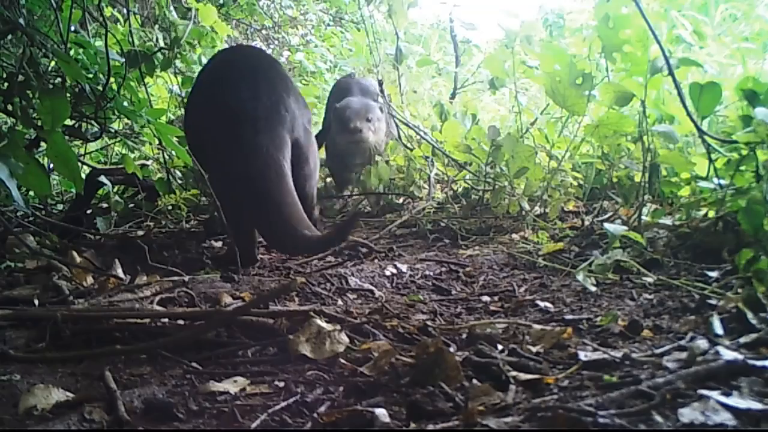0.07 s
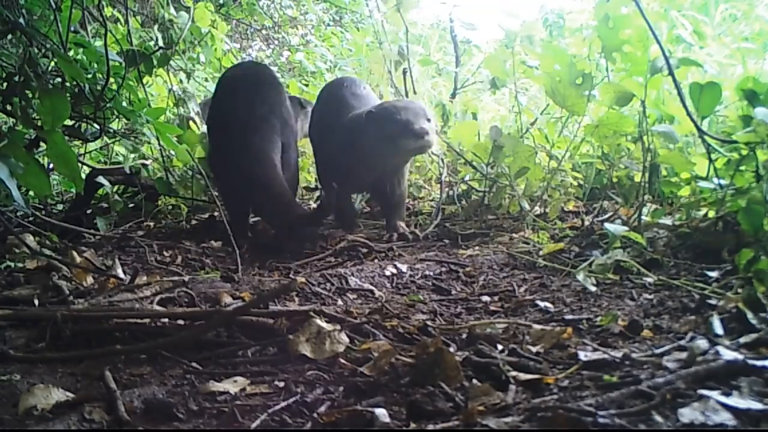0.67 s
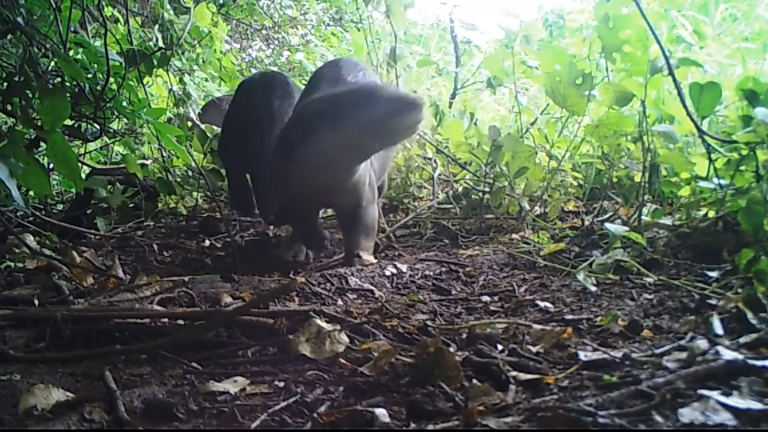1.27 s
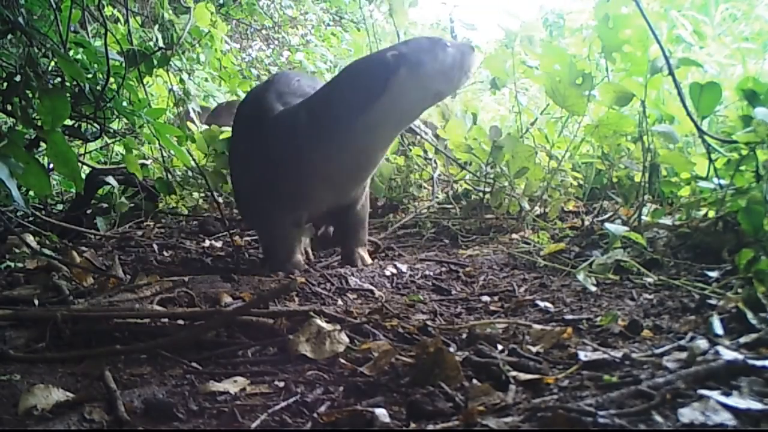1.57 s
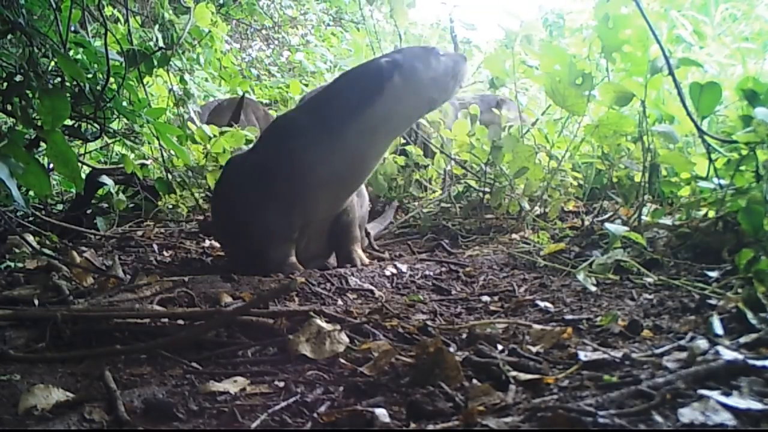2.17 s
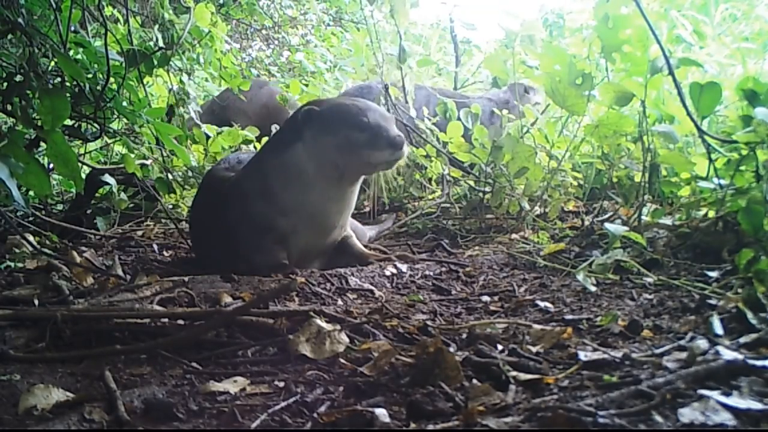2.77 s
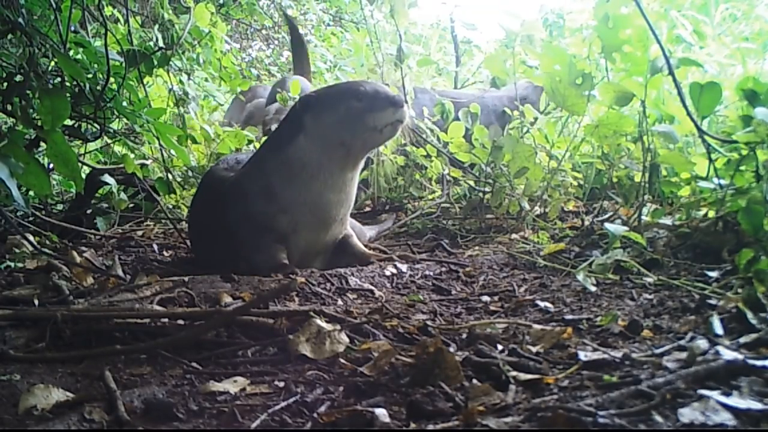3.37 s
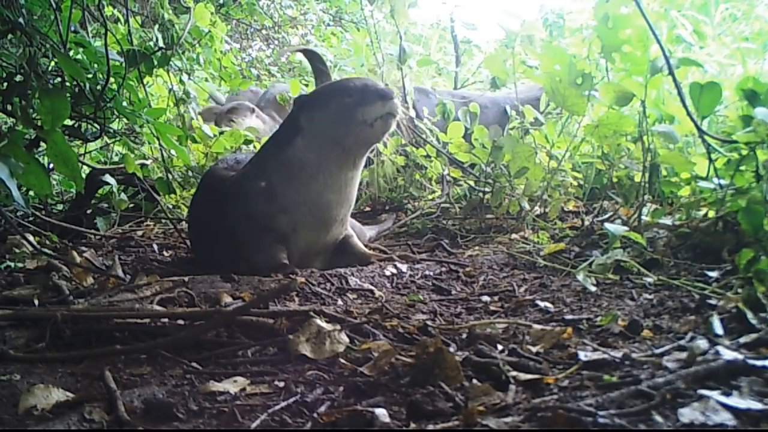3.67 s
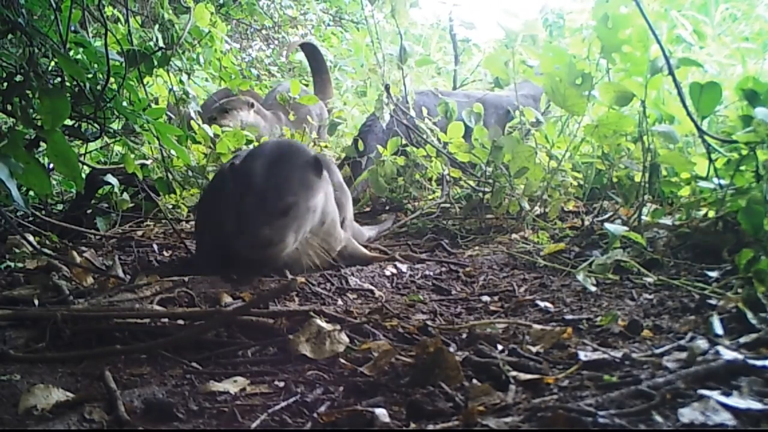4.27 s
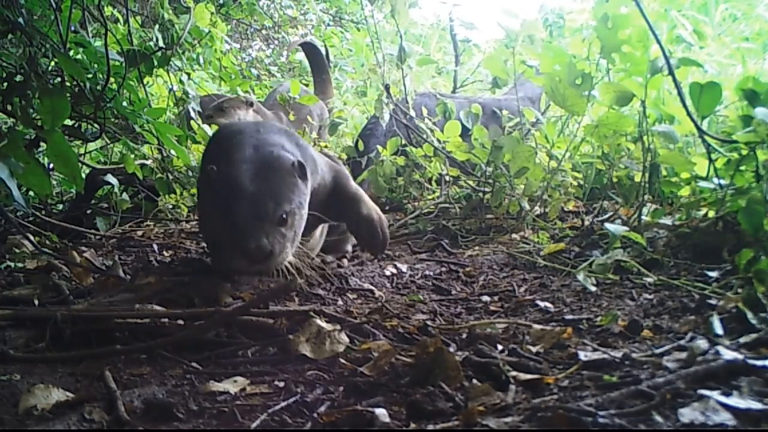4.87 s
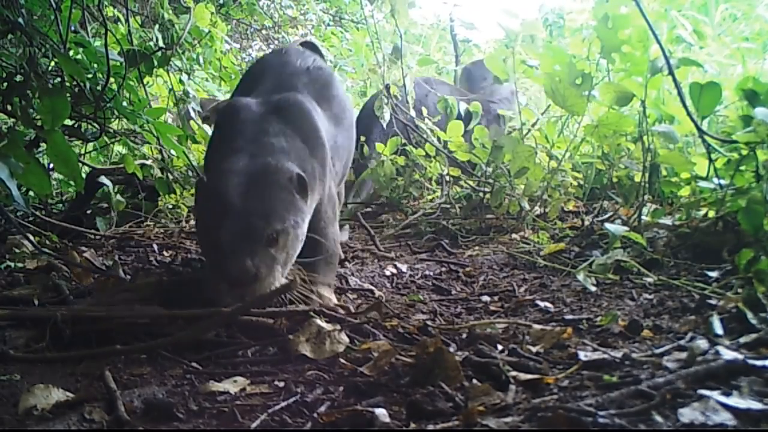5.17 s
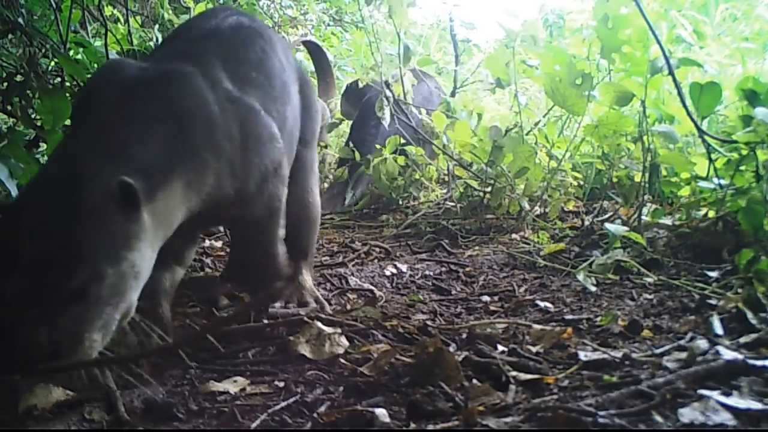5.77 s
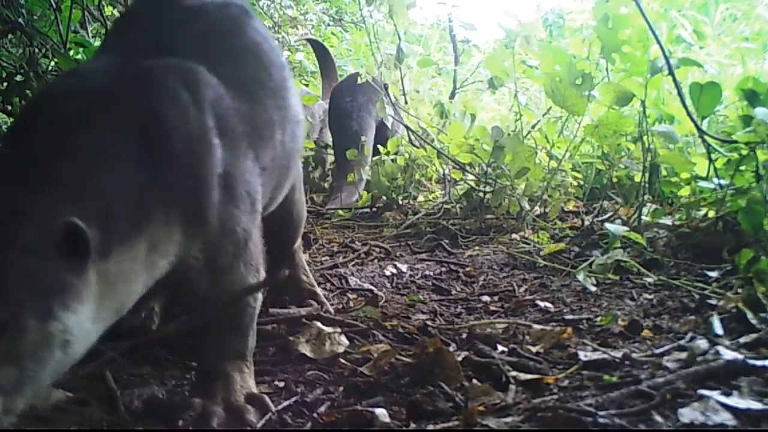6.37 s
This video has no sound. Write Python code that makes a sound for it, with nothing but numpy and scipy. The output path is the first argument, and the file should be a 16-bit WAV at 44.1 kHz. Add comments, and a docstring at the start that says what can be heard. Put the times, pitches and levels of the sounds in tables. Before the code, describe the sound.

An otter snorts a puff of air through its nose, then gives two short whistled squeaks edged with tiny low yelps, the second louder. Afterwards a distant bird repeats a quick three-note phrase while a faint low drone swells and fades. Paws crackle softly in leaf litter, busier near the end. A trail camera microphone picks this up in a thicket, over steady low rumble and faint high insects.

```python
"""A low far-off rumble and two trilling insects open on a thicket, where otters rustle over leaf litter.
One snorts and puffs air through its nose; two whistled squeaks follow, their voice breaking into low yelps.
A distant bird repeats a three-note phrase while a low drone swells and fades, and paws crackle on
through the leaves. The insects sing with their wings; leaves and stems scatter the calls and the trill."""
import sys
import numpy as np
from scipy import signal
from scipy.fft import rfft, irfft, next_fast_len
from scipy.io import wavfile
from scipy.ndimage import map_coordinates

SR = 44100
rng = np.random.default_rng(int(sys.argv[2]) if len(sys.argv) > 2 else 0)


def to_wav(sig):
    """Store sig (one row per channel, or 1-D mono) as 16-bit WAV at the path in sys.argv[1].

    Samples outside -1..1 are clipped; the rate is SR.
    """
    pcm = np.clip(np.atleast_2d(sig), -1, 1) * 32767
    pcm = np.round(pcm).astype(np.int16)
    wavfile.write(sys.argv[1], SR, pcm.T)  # frames by channels


N = 282681
WAKE_S = 0.093  # silence until here


def amp(db):
    """Decibels to gain."""
    return 10 ** (np.asarray(db) / 20)


def unit(x):
    """Scale to rms 1."""
    return x / np.sqrt(np.mean(x ** 2) + 1e-20)


def along(points, hz):
    """Read (freq_hz, value) points on a log frequency axis."""
    freqs, values = np.transpose(points)
    return np.interp(np.log(hz + 1), np.log(freqs + 1), values)


def clock():
    """The time of every sample, in seconds."""
    return np.arange(N) / SR


def wobble(rate_hz):
    """A smooth random curve with rate_hz knots a second."""
    return map_coordinates(rng.standard_normal(int(N * rate_hz / SR) + 4), [clock() * rate_hz])


def envelope(start, end, attack, release):
    """Rise from the start, hold, and fall to nothing at the end."""
    t = clock()
    return np.clip(np.minimum((t - start) / attack, (end - t) / release), 0, 1)


def filtered(x, response):
    """Filter x by a response given as a function of frequency."""
    size = next_fast_len(N + SR // 2)
    return irfft(rfft(x, size) * response(np.fft.rfftfreq(size, 1 / SR)), size)[:N]


def colour(x, spectrum):
    """EQ x with (freq_hz, gain_db) points, at rms 1."""
    return unit(filtered(x, lambda hz: amp(along(spectrum, hz))))


def noise(spectrum):
    """Noise with the given EQ, at rms 1."""
    return colour(rng.standard_normal(N), spectrum)


def running_phase(hz):
    """The phase of a pitch curve, in radians."""
    return 2 * np.pi * np.cumsum(hz) / SR


def rasp(hz, width_hz=680):
    """Noise in one narrow resonance that follows a pitch curve."""
    phase = running_phase(hz)
    return unit(wobble(width_hz) * np.sin(phase) + wobble(width_hz) * np.cos(phase))


def echo(x, delay_s, db):
    """Add one delayed reflection."""
    return x + amp(db) * filtered(x, lambda hz: np.exp(-2j * np.pi * hz * delay_s))


# Reverb time of the thicket, before stretch: freq_hz, t60_s
THICKET_DECAY = [(500, .1), (2000, 0.17), (4200, 0.1297), (6000, 0.21), (10000, 0.16)]
# Reverb EQ, bright because small leaves throw back short waves best: freq_hz, gain_db
THICKET_EQ = [(1000, -2), (3800, 2.5), (5400, -1), (7500, 4), (10500, 2.5), (14000, -4)]
def thicket(x, wet_db, stretch, build_s):
    """Add the scatter from leaves and stems, a short tail that takes a moment to build."""
    hz, t, spectra = signal.stft(rng.standard_normal(SR // 2), SR, nperseg=256)
    decay_db = -60 * t / (stretch * along(THICKET_DECAY, hz)[:, None])
    tail = signal.istft(spectra * amp(decay_db + along(THICKET_EQ, hz)[:, None]), SR, nperseg=256)[1]
    tail *= 1 - np.exp(-(np.arange(len(tail)) / SR / build_s) ** 2)
    return x + amp(wet_db) * signal.fftconvolve(x, tail / np.linalg.norm(tail))[:N]


# Low end of the bed: freq_hz, gain_db
RUMBLE_EQ = [(12, -34), (20, 0.5), (30, 2), (39, -3), (54, -5), (92, -7.5), (168, -16.5), (225, -19),
             (273, -21.5), (443, -27), (512, -29), (652, -32), (1520, -41.5), (3910, -47.5), (6500, -50),
             (8450, -93), (14300, -120)]
# Airy top of the bed: freq_hz, gain_db
HISS_EQ = [(3000, -29), (5500, -7), (7000, 2.5), (8500, 3), (10000, -1), (12000, -1.5), (14000, -3)]
def background(rumble_db=-50.5, sway_db=0.52, rise_db=2, full_s=0.268, hiss_db=-76):
    """A far-off rumble eases up to level and sways slightly under a thin, even hiss."""
    fade_db = rise_db * np.clip((clock() - full_s) / (full_s - WAKE_S), -1, 0)
    rumble = amp(rumble_db + fade_db + sway_db * wobble(7.5)) * noise(RUMBLE_EQ)
    return rumble + amp(hiss_db) * noise(HISS_EQ)


# The drone's bass hump: freq_hz, gain_db
DRONE_EQ = [(60, -27), (100, -3.5), (127, -5), (150, -12.5), (260, -31), (900, -83)]
def drone(level_db=-59.5):
    """A narrow band of low noise swells and fades far away."""
    return amp(level_db) * envelope(2.15, 4.77, attack=0.33, release=1) * noise(DRONE_EQ)


# The higher insect's held buzzes: start_s, end_s, pitch_hz, level_db
HELD_BUZZES = [(.05, 1.463, 8440, -77.5), (3.4, 5.3, 8650, -85.5), (5.5, 6.5, 8680, -83)]
# Its surges, growing longer as it warms up: peak_s, rise_s, level_db
BUZZ_SURGES = [(2.54, .06, -83), (2.96, .07, -77.5), (3.351, 0.1, -76.5), (3.76, .09, -76),
               (4.209, .16, -75.5), (4.662, 0.23, -76.5), (5.14, 0.26, -76)]
def insect_buzz(rest_hz=8560, lift_hz=292, fall_ratio=0.58, edge_s=0.039, ragged_db=1.5):
    """Uneven strokes rasp in one narrow resonance, held steady or in surges that lift the pitch."""
    held = sum(amp(db) * envelope(start, end, edge_s, edge_s) * rasp(np.full(N, hz))
               for start, end, hz, db in HELD_BUZZES)
    effort, gain = np.zeros(N), np.zeros(N)
    for peak, rise, db in BUZZ_SURGES:
        t = clock() - peak
        swell = np.exp(-(t / np.where(t < 0, rise, fall_ratio * rise)) ** 2)
        effort += swell
        gain += amp(db) * swell
    surges = gain * rasp(rest_hz + lift_hz * effort)
    return (held + surges) * amp(ragged_db * wobble(60))


# The lower insect's bouts: start_s, end_s, attack_s, level_db
TRILL_BOUTS = [(0.073, .37, 0.044, -71.5), (5.456, 6.327, 0.14, -72.5)]
def insect_trill(pitch_hz=7230, swing_hz=125, strokes_hz=23, depth_db=4.0, rasp_hz=140):
    """An insect's wing strokes each slide down in pitch; the foliage smears them."""
    bouts = sum(amp(db) * envelope(start, end, attack, release=0.054)
                for start, end, attack, db in TRILL_BOUTS)
    stroke = running_phase(strokes_hz * (1 + 0.0206 * wobble(4.5)))
    hz = pitch_hz + swing_hz * np.cos(stroke) + rasp_hz * wobble(700)
    pulses = np.sin(running_phase(hz)) * amp(depth_db * np.sin(stroke))
    return bouts * unit(thicket(pulses, wet_db=-5.0, stretch=0.69, build_s=0.0059))


# One phrase, the last two rows joined as one note:
# delay_s, length_s, first_hz, last_hz, level_db, jitter_ratio
BIRD_NOTES = [(0, 0.024, 3996, 4044, -71.5, 0.0068), (0.041, 0.0363, 6260, 5490, -67.5, 0.0225),
              (0.096, .03, 3220, 3080, -75.5, .035), (.111, .033, 3390, 5220, -65.5, 0.014)]
# Each repeat trims and stretches those notes: start_s, trim_db, stretch_ratio
BIRD_PHRASES = [(2.352, -1, 1.01), (2.662, -1, 1.028), (2.972, 0, 1.0), (3.277, 0, 1.04)]
def bird(trim_db=-4, bend=0.85, arch=0.61):
    """A clean level note, a hoarse falling one and an upsweep, half lost in the bushes."""
    song = np.zeros(N)
    for start, phrase_db, stretch in BIRD_PHRASES:
        waver = wobble(700)
        for delay, length, first_hz, last_hz, db, jitter in BIRD_NOTES:
            onset = start + stretch * delay
            progress = np.clip((clock() - onset) / (stretch * length), 0, 1)
            hz = first_hz + (last_hz - first_hz) * progress ** bend  # the slide slows towards its end
            swell = (4 * progress * (1 - progress)) ** arch
            song += swell * amp(db + phrase_db) * np.sin(running_phase(hz * (1 + jitter * waver)))
    with_bush_echo = echo(song, delay_s=0.032, db=-12)
    return amp(trim_db) * thicket(with_bush_echo, wet_db=2.5, stretch=1.1, build_s=0.0009)


def presses(rows):
    """The summed swells of paws taking weight."""
    return sum(amp(db) * np.exp(-0.5 * ((clock() - peak) / half) ** 2) for peak, half, db in rows)


# Steps and scuffs in the leaves: peak_s, half_length_s, level_db
LEAF_STEPS = [(.22, 0.077, -75), (.53, 0.031, -71.5), (0.706, 0.021, -69.5), (1.294, 0.066, -76.5),
              (2.08, 0.072, -72.5), (2.283, 0.013, -70), (2.335, 0.017, -68.5), (2.75, 0.02, -73.5),
              (3.0, 0.084, -77), (3.48, 0.0315, -76.5), (3.76, .015, -76), (3.908, 0.015, -69),
              (3.955, .016, -75), (4.23, 0.016, -76), (5.252, 0.013, -70.5), (5.30, 0.076, -68),
              (5.42, 0.028, -73.5), (5.568, 0.059, -68), (5.92, 0.089, -72.5), (6.04, 0.03, -74),
              (6.097, 0.02, -70), (6.39, 0.053, -71.5)]
# Crisp leaf litter: freq_hz, gain_db
LEAF_EQ = [(700, -15.5), (2000, -9), (4000, -6.5), (6000, -3.5), (8000, 0), (9500, -7), (11500, -14),
           (14000, -39)]
# Near paws crunching the soil: peak_s, half_length_s, level_db
SOIL_STEPS = [(5.385, .012, -69), (6.112, 0.0165, -71), (6.31, 0.04, -74)]
# Dull soil: freq_hz, gain_db
SOIL_EQ = [(200, -18), (600, 3.5), (1500, -3), (2500, -15), (5000, -30)]
def paw_steps(grain_db=2.0, clump_db=1.0, snaps_per_s=64, snap_db=-11):
    """Paws press damp litter: clumps of crackle, snapping twigs and leaf edges, a crunch of soil."""
    crackle = rng.standard_normal(N) * amp(grain_db * wobble(1100) + clump_db * wobble(130))
    snaps = (rng.random(N) < snaps_per_s / SR) * rng.uniform(0.5, 1, N)
    litter = colour(unit(crackle) + amp(snap_db) * unit(snaps), LEAF_EQ)
    return presses(LEAF_STEPS) * litter + presses(SOIL_STEPS) * noise(SOIL_EQ)


# Breath through the snout: freq_hz, gain_db
SNOUT_EQ = [(530, -49), (900, -15), (942, -16), (1030, -13), (1460, -18.5), (2110, -9.5), (5920, -7),
            (6640, -7), (9050, -4.5), (14000, -25.5)]
def snuffle(start_s=0.3, end_s=0.526, level_db=-59.5, nose_hz=5840, rise_hz_per_s=2200, nose_db=-7.5):
    """An otter blows one puff through its nose; a faint nostril whistle grows and rises with it."""
    puff = envelope(start_s, end_s, attack=0.074, release=0.07)
    age = np.clip(clock() - start_s, 0, end_s - start_s)
    whistle = amp(nose_db) * age / age.mean() * rasp(nose_hz + rise_hz_per_s * age, width_hz=280)
    return puff * amp(level_db + 0.67 * wobble(86)) * (noise(SNOUT_EQ) + whistle)


# Midrange body of the snort: freq_hz, gain_db
SNORT_EQ = [(500, -30), (950, 0), (1400, -7), (2300, -6), (3200, -25)]
def snort(start_s=0.322, length_s=0.023, level_db=-61.5):
    """The nostrils open with a dull burst."""
    burst = envelope(start_s, start_s + length_s, length_s / 2, length_s / 2)
    return amp(level_db) * burst * noise(SNORT_EQ)


# Breath leading into the first squeak: start_s, end_s, centre_hz, width_hz, level_db
THROAT_WHEEZES = [(0.813, 0.838, 5955, 593.6, -65), (0.834, 0.86, 8740, 2660, -62.5)]
def wheezes():
    """Air squeezes through the otter's tight throat."""
    air = np.zeros(N)
    for start, end, hz, width_hz, db in THROAT_WHEEZES:
        edge_s = (end - start) / 2
        air += amp(db) * envelope(start, end, edge_s, edge_s) * rasp(np.full(N, hz), width_hz)
    return air


def voice(rows, jitter, flutter_db, dive_hz_per_s=60000, mouth_hz=3750, mouth_width_hz=220, mouth_db=11.5):
    """A voiced glide that roughens as it dives and flares as it sweeps through the mouth's resonance."""
    times, *columns = np.transpose(rows)
    hz, db, octave_db = [np.interp(clock(), times, column) for column in columns]
    strain = 1 + 1.5 * np.clip(-np.gradient(hz) * SR / dive_hz_per_s, 0, 1)
    phase = running_phase(hz * (1 + strain * jitter * wobble(700)))
    flare = amp(mouth_db * np.exp(-((hz - mouth_hz) / mouth_width_hz) ** 2))
    treble_pass = np.clip((11300 - 3 * hz) / 1500, 0, 1)  # the mouth cuts off a high third harmonic
    overtones = np.sin(2 * phase) + amp(-8) * treble_pass * np.sin(3 * phase)
    gain = amp(db) * envelope(times[0], times[-1], attack=0.002, release=0.002)
    flutter = amp(strain * flutter_db * wobble(300))
    return gain * flutter * (flare * np.sin(phase) + amp(octave_db) * overtones)


# Low yelps, one curve into the first squeak and one out of the second:
# time_s, pitch_hz, level_db, octave_db (overtone, relative to level_db)
YELP_CURVES = [
    [(.832, 854, -51, -28), (.841, 980, -57.5, -18), (.846, 1200, -65, -9), (.851, 1480, -57, -17),
     (.854, 1650, -61.5, -22)],
    [(1.625, 1190, -58, -2), (1.634, 1190, -61, -5), (1.641, 1005, -61.5, -3), (1.647, 930, -54, -13),
     (1.654, 846, -65, -16)],
]
# The two squeaks, one curve each: time_s, pitch_hz, level_db, octave_db
SQUEAK_CURVES = [
    [(.853, 3350, -59, -2), (.858, 3790, -65.5, -4), (.863, 4600, -64, -4), (.871, 5540, -53, -19),
     (.880, 5750, -50, -21), (.888, 5840, -45, -20.5), (.905, 5770, -47, -33), (.922, 5410, -49, -15),
     (.930, 5120, -60.5, 5.5), (.935, 4460, -64.5, 16), (.939, 3630, -60, 0), (.943, 2760, -57, -1)],
    [(1.543, 5033, -63, -20), (1.560, 5380, -57, -17.5), (1.578, 5376, -48.5, -17),
     (1.586, 5380, -45.5, -15.5), (1.591, 5230, -49.5, -8), (1.596, 5030, -37.5, -17.5),
     (1.607, 4170, -38, -13), (1.613, 3700, -50.5, -7), (1.619, 3190, -57.5, -2), (1.629, 2720, -63, -8)],
]
def otter_calls(squeak_trim_db=0.1, wheeze_trim_db=-1):
    """The voice catches, then breaks between low little yelps and a clean arched whistle."""
    squeaks = sum(voice(rows, jitter=0.0033, flutter_db=-0.4) for rows in SQUEAK_CURVES)
    yelps = sum(voice(rows, jitter=0.021, flutter_db=3.0) for rows in YELP_CURVES)
    breath = amp(wheeze_trim_db) * wheezes()
    with_trunk_echo = echo(amp(squeak_trim_db) * squeaks, delay_s=0.01, db=-12.5)
    return (thicket(with_trunk_echo, wet_db=-7, stretch=0.97, build_s=0.0039)
            + thicket(yelps + breath, wet_db=-10, stretch=0.59, build_s=0.0045))


def scene():
    """Otters, bird and insects over the low bed, mixed in mono."""
    animals = otter_calls() + snuffle() + snort() + bird() + insect_trill() + insect_buzz()
    return (animals + paw_steps() + background() + drone())[None]


def record(dry, fade_s=0.017, top_hz=14000):
    """A trail camera's microphone wakes a moment late and passes nothing above its band limit."""
    awake = np.clip((clock() - WAKE_S) / fade_s, 0, 1)
    return filtered(dry[0] * awake, lambda hz: hz < top_hz)[None]


dry = scene()
out = record(dry)
to_wav(out)
```